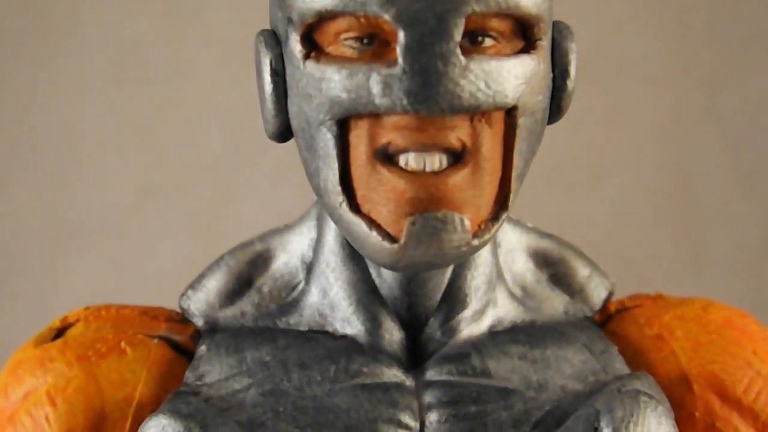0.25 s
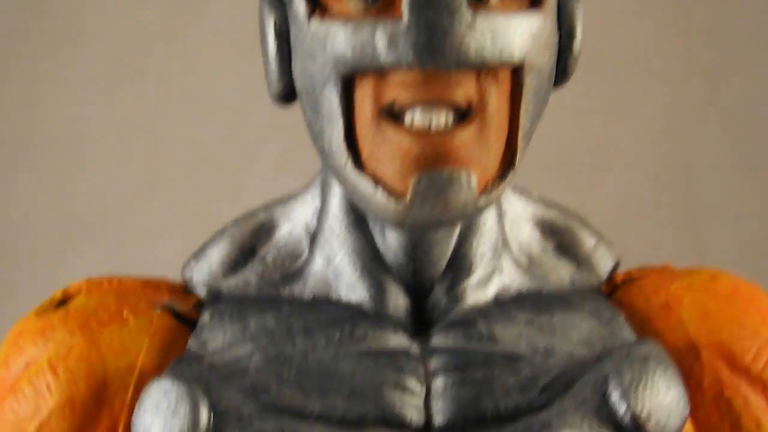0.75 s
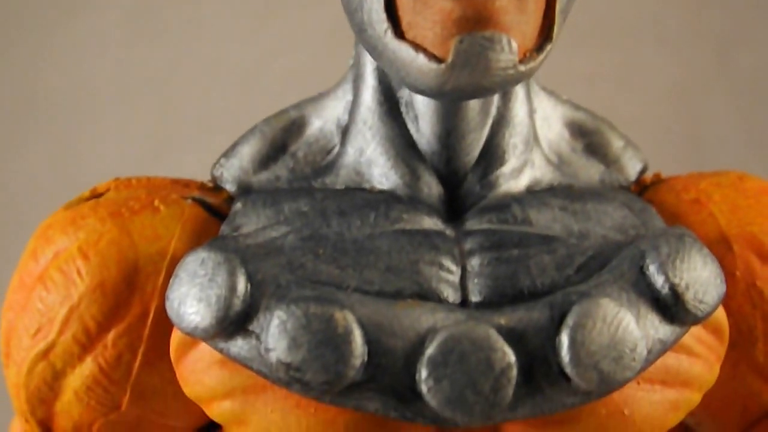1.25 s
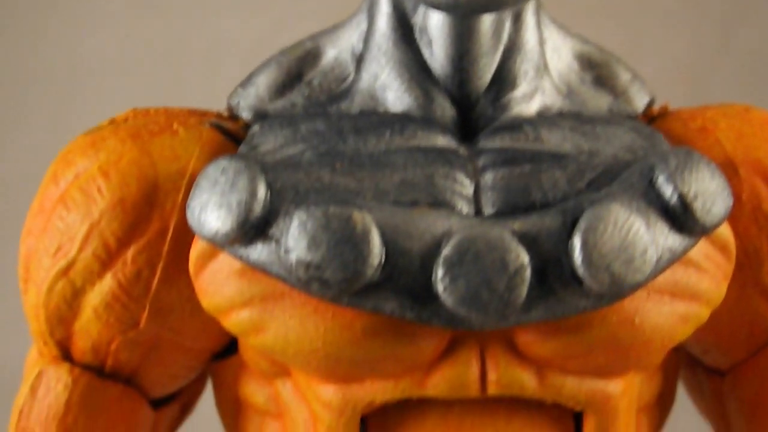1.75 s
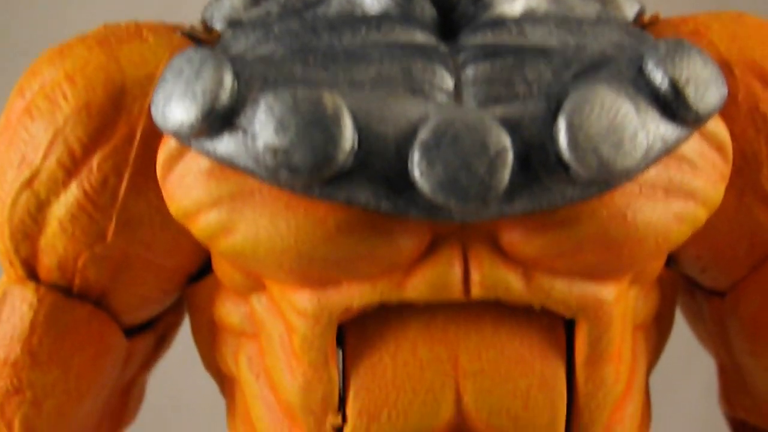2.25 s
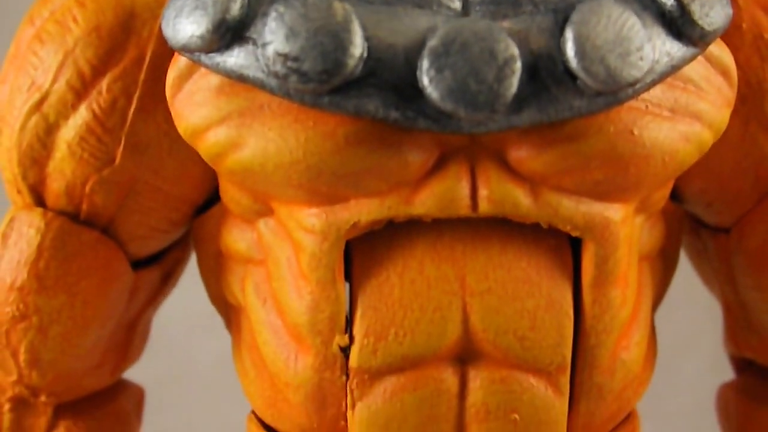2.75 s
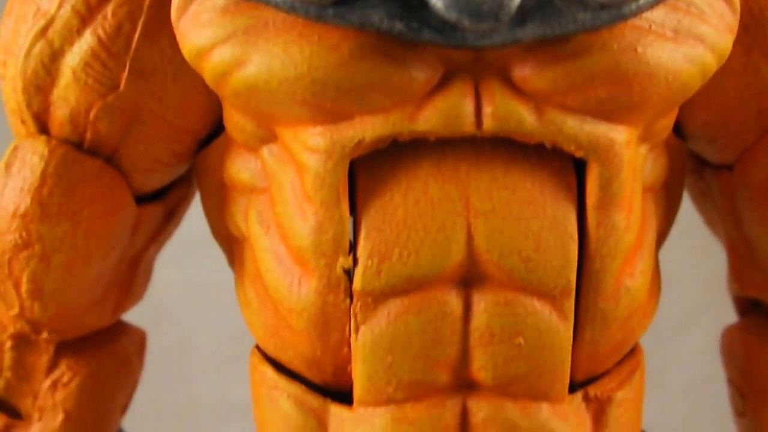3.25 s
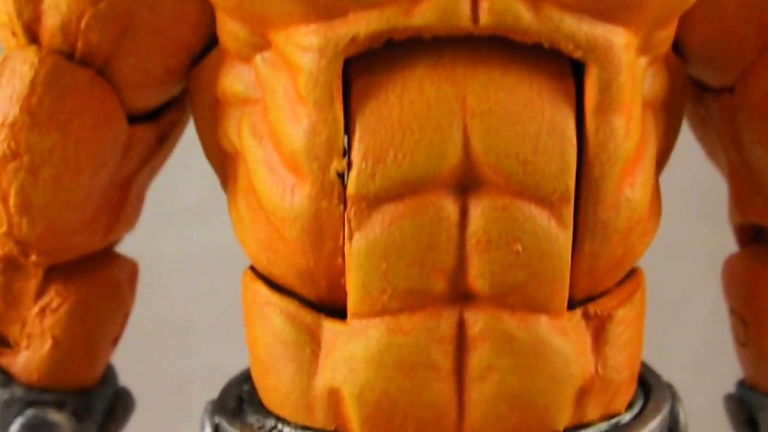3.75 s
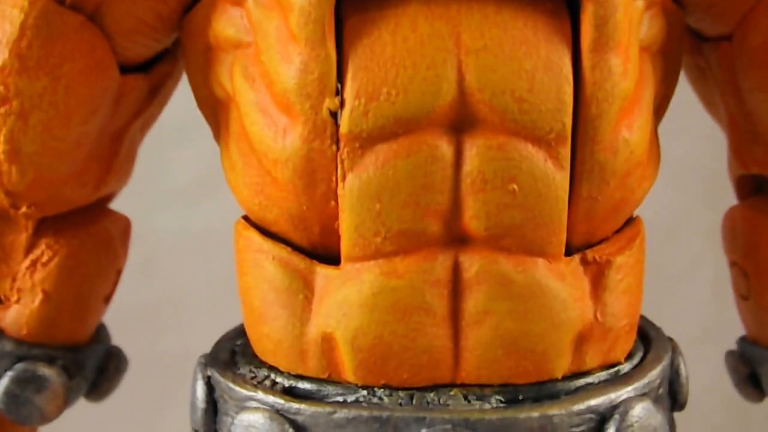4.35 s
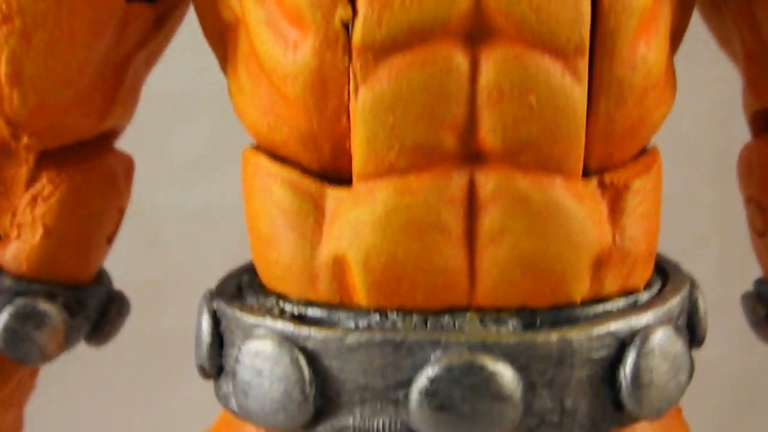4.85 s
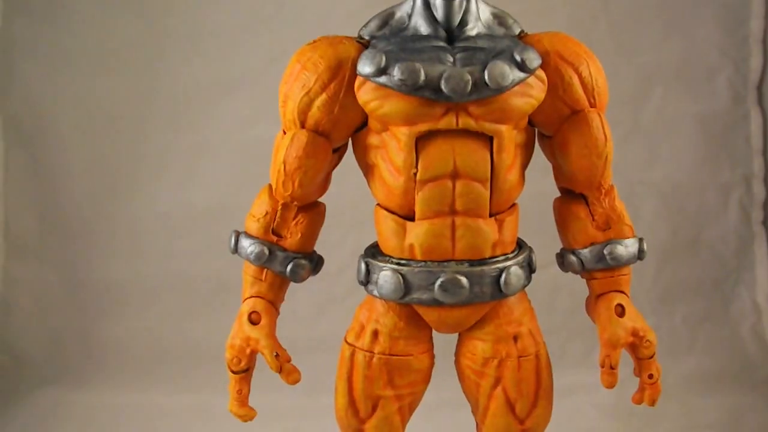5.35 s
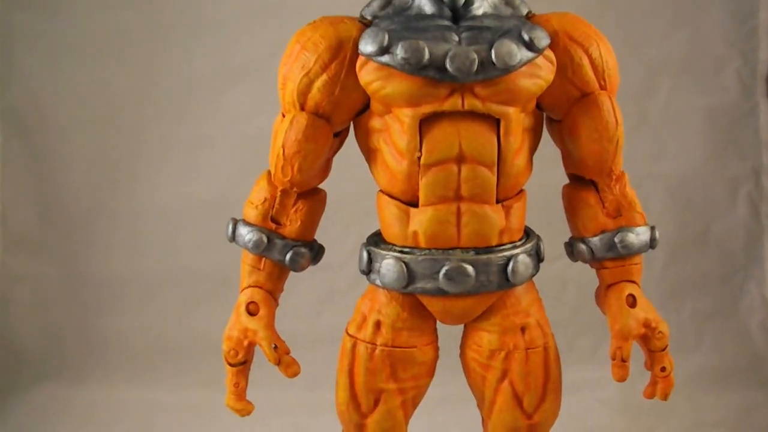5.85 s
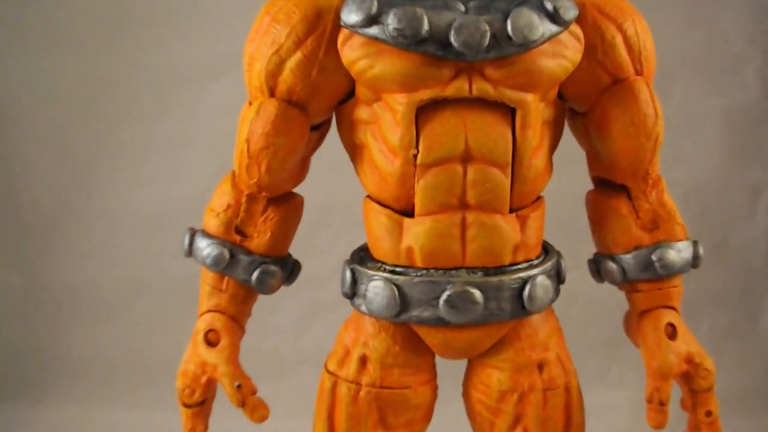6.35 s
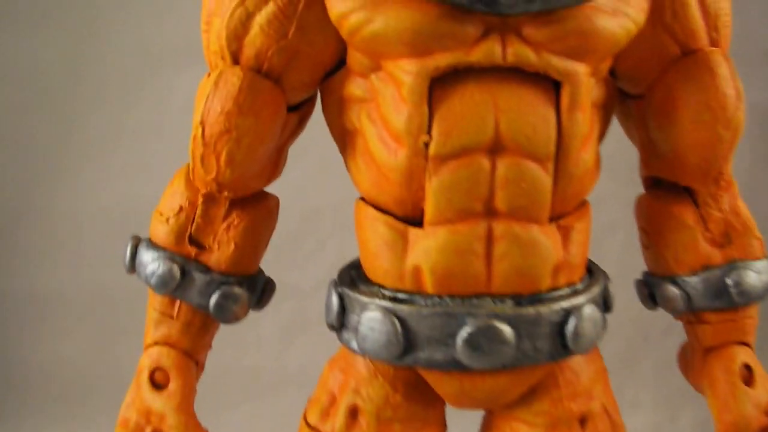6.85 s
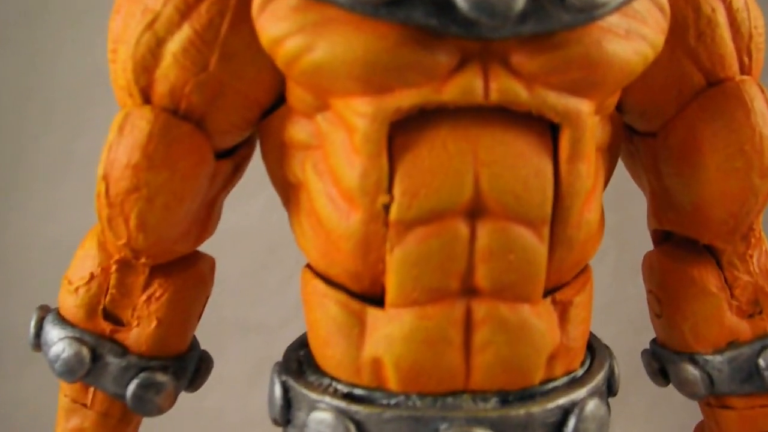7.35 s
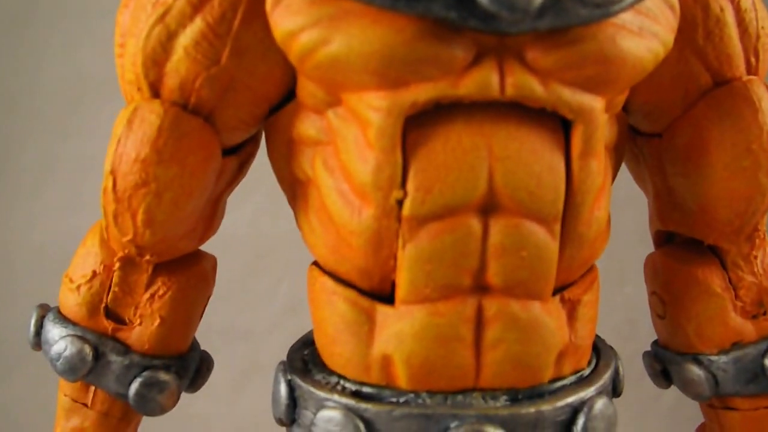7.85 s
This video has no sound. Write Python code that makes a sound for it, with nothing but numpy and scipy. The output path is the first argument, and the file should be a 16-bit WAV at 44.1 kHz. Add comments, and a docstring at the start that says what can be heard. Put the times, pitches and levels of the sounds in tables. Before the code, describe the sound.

A camera is heard through its own microphone in a quiet room, over steady low rumble, hiss and a hum that eases after the first second. A light tap comes at 0.3 seconds, then sharp control clicks at 1 and 1.6 seconds. Faint rubs on the body follow, with a cluster of softer, rattly clicks between 3 and 4 seconds. From 4.3 seconds the focus motor ticks in short, chirping pulses, quickening and ending with two clicks just before 5 seconds. The sound cuts out for an instant at 5 seconds. At 5.3 seconds a sharp knock on the housing, the loudest event, is followed by a smaller rebound. The motor ticks again, about ten pulses a second, from 5.5 to 6.3 seconds. A very faint zoom rustle swells and fades around 7 seconds, and the ticking returns from 7.5 seconds until the end, just after 8.

```python
"""A quiet room, in which a camera is heard through its own built-in microphone.
The sound is structure-borne: the focus motor steps in short bursts that force the housing to vibrate,
and the clicks, rattles and knocks of the controls excite the modes of the same shell.
Beneath them lie a faint rubbing drone of the shell as it is handled and tilted, the zoom's rustle,
room rumble, mains hum and hiss. The sound drops out once, briefly, about five seconds in."""
import sys
import numpy as np
from scipy import signal
from scipy.fft import rfft, irfft, next_fast_len
from scipy.io import wavfile
from scipy.ndimage import uniform_filter1d

SR = 44100
rng = np.random.default_rng(int(sys.argv[2]) if len(sys.argv) > 2 else 0)


def master_out(mix):
    """Clip the mix to full scale and print it as 16-bit PCM to the path in sys.argv[1]."""
    frames = np.transpose(np.atleast_2d(mix))
    ceiling = np.clip(frames, -1, 1)
    pcm = np.round(ceiling * 32767).astype(np.int16)
    wavfile.write(sys.argv[1], SR, pcm)


N = 357651
TIME = np.arange(N) / SR
BRIEF = TIME[:SR // 4]  # time axis of one short event [s]
IMPULSE = signal.unit_impulse(len(BRIEF))
TOP_HZ = 15800


# modes of the motor's mount: (frequency [Hz], T60 [s], level [dB])
MOUNT_MODES = [(203, 0.15, -0.5), (249, 0.078, -1), (302, 0.064, 2), (418, 0.026, 2), (515, 0.027, -4.5),
               (743, 0.015, 2.5), (803, 0.04, -0.5), (933, 0.065, 3.5), (1387, 0.064, -5)]
# spectrum of the gear's scrape: (frequency [Hz], gain [dB])
SCRAPE_SPECTRUM = [(500, -12), (1000, 1), (1450, 2), (1900, -2), (2400, -2), (2800, -1), (3300, -10),
                   (4500, -16), (12000, -22)]
def focus_motor(step_hz=1045, jitter=0.012, rise_s=0.0043, sag_s=0.014, stop_s=0.0041, scrape_s=0.0097):
    """Forced vibration: steps drive the shell near a resonance, and each start jolts the mount."""
    out = np.zeros(N)
    for start, db, run_s in focus_bursts():
        wobble, grit = rng.standard_normal((2, len(BRIEF)))
        rise_scale, sag_scale = np.exp(0.46 * rng.uniform(-0.53, 1, 2))
        attack = np.minimum(BRIEF / (rise_s * rise_scale), 1)
        decay = np.exp(-BRIEF / (sag_s * sag_scale) - np.maximum(BRIEF - run_s, 0) / stop_s)
        step_rate = step_hz * (1 + jitter * unit(uniform_filter1d(wobble, size=130)))
        torque = attack * decay * np.sin(2 * np.pi * np.cumsum(step_rate) / SR)
        tone = strong(torque) + undb(-12) * strong(housing(torque))
        # the gear takes up its play with a kick and a brief scrape
        scrape = grit * np.minimum(BRIEF / rise_s, 1) * np.exp(-BRIEF / scrape_s)
        jolt = signal.fftconvolve(scrape + 5 * IMPULSE, modes(MOUNT_MODES))[:len(BRIEF)]
        backlash = undb(-7) * strong(jolt) + undb(-16) * strong(colour(scrape, SCRAPE_SPECTRUM))
        backlash_db = -31.5 + 0.19 * (db + 31.5)  # stays strong even when the run is weak
        add(out, start, undb(db - 2.5) * strong(tone) + undb(backlash_db) * backlash)
    return out


# focus searches, broken off once the picture is sharp: (start [s], end [s], level [dB])
FOCUS_SEARCHES = [(4.252, 4.51, -35), (5.4733, 6.4, -33), (7.5411, 8.11, -31.5)]
# to-and-fro pattern of every search: (delay [s], relative level [dB])
PROBE_PATTERN = [(0, 1.5), (0.1086, -0.5), (.198, 2.5), (.310, -5), (0.401, 2), (0.504, 1), (.605, 2),
                 (.708, 4.5), (0.819, -7.5)]
def focus_bursts():
    """Hunting for focus gives intermittent runs, returned as (time [s], level [dB], duration [s])."""
    probes = [(start + delay, db + relative_db, 0.023)
              for start, end, db in FOCUS_SEARCHES
              for delay, relative_db in PROBE_PATTERN if start + delay < end]
    # the first search closes in with quicker, growing bursts, then settles with one long run
    approach = [(4.5535 + k * 0.0672, -31.5 + k * 0.5, 0.014) for k in range(4)]
    settle = [(4.801, -33, 0.033)]
    return probes + approach + settle


# modes of the catch and of its snap's bright edge: (frequency [Hz], T60 [s], level [dB])
CATCH_MODES = [(3060, 0.023, 15), (3760, 0.024, 11), (4160, 0.02, -16)]
EDGE_MODES = [(6000, 0.005, -2.2), (6730, 0.0039, -2), (7700, 0.0037, -3)]
# spectra of the catch's snap and chatter: (frequency [Hz], gain [dB])
SNAP_SPECTRUM = [(150, -18), (400, -34), (700, -24), (1100, 5), (1400, -26), (1750, -2.5), (2200, 12.5),
                 (2450, 4), (2900, 21), (3400, 2), (4100, 8), (4900, -15.5), (7000, -34), (9000, -45),
                 (16000, -28)]
CHATTER_SPECTRUM = [(1000, -28), (2100, -5.5), (2500, -7), (2850, 8), (3150, -6), (3450, -11), (4100, -14),
                    (4900, -25.5), (7000, -24), (12000, -28)]
# clicks of the controls: (time [s], level [dB], seating [dB re level], seating frequency [Hz],
# thump [dB re seating], rattle [dB re level], rattle rise time [s], contact corner [Hz])
CONTROL_CLICKS = [(0.979, -27, -5, 1055, -6, -16, 0.014, 8500),
                  (1.135, -44.5, -3, 1020, -3, -24, .01, 4500),
                  (1.599, -21.5, -9.5, 1030, -6, -16, 0.011, 7450),
                  (1.65, -43.5, -19, 950, -6, -9, 0.012, 3500),
                  (2.914, -41.5, -6, 970, 3, -12, 0.0074, 3500),
                  (3.0844, -47.5, 0.5, 1000, 2, -4.5, 0.016, 3500),
                  (3.2367, -34, -1, 1020, -3.5, -11.5, 0.0079, 7000),
                  (3.293, -40, -1.5, 980, -1, -4, 0.0091, 6500),
                  (3.429, -40, -1.5, 995, 1, -14, .006, 5500),
                  (3.733, -34, -1.5, 1010, -3, -7.5, 0.018, 9500),
                  (3.929, -43.5, -4, 990, 2, -14, 0.009, 5000),
                  (4.779, -31.5, 1.5, 1006, -6.5, -17, 0.0088, 11000),
                  (4.8993, -31, 2, 1017, -7, -9.5, .02, 6000)]
def clicks(snap_s=0.00078, seat_s=0.0094, uneven_db=7):
    """Impulsive excitation: a catch snaps, seats with a chirp and thump, then chatters on the shell."""
    out = np.zeros(N)
    thump = strong(band(contact_force(910), 430, 560))
    shell = strong(band(contact_force(2500), 1400, 300))
    for start, db, seat_db, seat_hz, thump_db, rattle_db, crest_s, corner_hz in CONTROL_CLICKS:
        seat = chirp(seat_hz, seat_s) + undb(thump_db) * thump + undb(-8) * shell
        grit, impacts, size = rng.standard_normal((3, len(BRIEF)))
        force = IMPULSE + 0.42 * grit * np.exp(-BRIEF / snap_s)
        ring = undb(-8) * strong(modes(CATCH_MODES)) + undb(-13) * strong(modes(EDGE_MODES))
        snap = strong(colour(force, SNAP_SPECTRUM)) + ring
        snap = strong(butterworth(snap, 3, min(corner_hz, TOP_HZ)))
        swell = BRIEF / crest_s * np.exp(-0.5 * (BRIEF / crest_s) ** 2)
        chatter = impacts * undb(uneven_db * np.minimum(size, 2)) * swell
        shell_ring = undb(-4) * strong(band(housing(chatter), 1130, 460))
        crackle = undb(-8) * strong(double_band(chatter, 1000, 1700))
        rattle = strong(strong(colour(chatter, CHATTER_SPECTRUM)) + shell_ring + crackle)
        add(out, start, undb(db) * (undb(-2) * snap + undb(seat_db) * seat + undb(rattle_db) * rattle))
    return out


# knocks on the housing: (time [s], level [dB], contact corner [Hz], low cut [Hz], damping time [s],
# rebound delay [s], rebound frequency [Hz], rebound [dB re blow],
# snap frequency [Hz], snap duration [s], snap [dB re blow], crack [dB re blow])
HOUSING_KNOCKS = [(0.2709, -26, 1330, 1200, 0.016, 0.003, 1265, -6.5, 2833, 0.0052, -7.5, -54),
                  (5.2931, -8, 3150, 45, 0.069, .00457, 1085, -8.6, 2690, .0031, -15, -23),
                  (5.3464, -19, 1060, 80, 0.073, 0.00388, 954, -3.5, 2850, 0.0038, -13.5, -31),
                  (5.3727, -36, 2600, 500, .015, .003, 1090, -6, 2820, 0.0054, -2, -20)]
def knocks(yield_s=0.00092, rebound_s=0.0086, crack_delay_s=0.00172):
    """Damped impact: the hand deadens a blow; the catch snaps home with a crack and the part rebounds."""
    out = np.zeros(N)
    soft_touch = undb(-9) * contact_force(1750)
    crack = strong(band(IMPULSE, 4800, 6500))
    for (start, db, corner_hz, low_cut_hz, damping_s, delay_s, rebound_hz, rebound_db,
         snap_hz, snap_s, snap_db, crack_db) in HOUSING_KNOCKS:
        force = soft_touch + contact_force(corner_hz, yield_s)
        # a light, glancing blow hardly moves the shell's low modes
        ring = butterworth(housing(force), 3, low_cut_hz, "high")
        blow = strong(ring * np.exp(-BRIEF / damping_s))
        rebound = undb(rebound_db) * chirp(rebound_hz, rebound_s, delay_s)
        snap = undb(snap_db) * chirp(snap_hz, snap_s)
        add(out, start, undb(db) * (blow + rebound + snap))
        add(out, start + crack_delay_s, undb(db + crack_db) * crack)
    return out


# modes of the camera's shell: (frequency [Hz], T60 [s], level [dB])
SHELL_MODES = [(306, 0.015, 17.5), (389, 0.5, -4), (780, 0.047, -6.5), (998, 0.051, -9), (1091, 0.051, 5.4),
               (1160, 0.18, -21), (1183, 0.041, -2), (1368, 0.022, -4), (1490, 0.013, 1.5),
               (1780, 0.014, -1), (2194, 0.021, -0.5), (2686, 0.011, 13), (2888, 0.055, -1.5),
               (3140, 0.016, -6)]
def housing(force, radiation_hz=740):
    """Modal response: close modes of the shell beat, and so small a body radiates little bass."""
    impulse_response = butterworth(modes(SHELL_MODES), 4, radiation_hz, "high")
    return signal.fftconvolve(force, impulse_response)[:len(force)]


# loose parts shaken by a click or knock: (time [s], level [dB], frequency [Hz], bandwidth [Hz])
LOOSE_PARTS = [(1.6055, -36, 2750, 400), (1.6145, -38, 3100, 350), (5.3495, -44.5, 3720, 110),
               (5.368, -44, 4700, 700)]
def ticks():
    """Free vibration: each loose part rings briefly in one high resonance."""
    out = np.zeros(N)
    for start, db, hz, width_hz in LOOSE_PARTS:
        add(out, start, undb(db) * strong(double_band(IMPULSE, hz, width_hz)))
    return out


# stuttering rubs heard in the shell: (time [s], duration [s], level [dB], frequency [Hz])
RUB_SPURTS = [(0.448, .045, -54, 1060), (1.799, 0.018, -58, 1080), (1.921, .03, -48, 1055),
              (1.958, 0.053, -55, 1050), (2.282, .05, -48.5, 1068), (2.463, 0.046, -50, 1070),
              (2.71, 0.04, -49.5, 1090), (3.31, 0.016, -43, 1195), (3.565, 0.03, -68, 1070),
              (8.069, 0.024, -43.5, 1060)]
# low swells of the handled body: (time [s], duration [s], level [dB], frequency [Hz], bandwidth [Hz])
HANDLING_SWELLS = [(3.03, 0.16, -42.5, 135, 26), (6.25, 0.5, -46.5, 162, 40)]
def brief_friction(spurt_width_hz=120):
    """Frictional excitation: each short rub feeds noise into one resonance of the camera's body."""
    out = np.zeros(N)
    spurts = [(*row, spurt_width_hz) for row in RUB_SPURTS]
    for start, length_s, db, hz, width_hz in spurts + HANDLING_SWELLS:
        steady_rub = double_band(rng.standard_normal(2 * SR), hz, width_hz)[SR:]
        envelope = np.sin(np.pi * np.minimum(TIME[:SR] / length_s, 1))
        add(out, start, undb(db) * strong(steady_rub * envelope))
    return out


# faint rubbing drone of the handled shell: (time [s], level [dB])
DRONE_LEVELS = [(0.0, -60.5), (0.56, -61), (0.97, -56.5), (1.33, -59), (1.76, -56.5), (2.1, -62),
                (3.16, -57.5), (4.11, -59.5), (4.85, -53), (4.98, -59), (6.2, -58), (6.9, -61.5),
                (8.1, -59)]
def handling_drone(drone_hz=1095, uneven_db=2.5):
    """Sliding friction: the shell drones faintly and unevenly as it is handled and tilted."""
    friction = rng.standard_normal(N) * undb(uneven_db * wander(rate_hz=16))
    rubbing = double_band(friction, drone_hz, 300)
    drone = unit(unit(rubbing) + undb(-16.5) * unit(band(rubbing, drone_hz, 39)))
    return gain_curve(DRONE_LEVELS) * drone


def zoom_rustle(peak_s=6.96, peak_db=-56.5, fade_db_per_s=22):
    """Band-limited noise: the rustle rises and falls as the zoom speeds up and slows down."""
    rustle = unit(double_band(rng.standard_normal(N), 2870, 1600))
    return undb(peak_db - fade_db_per_s * np.abs(TIME - peak_s)) * rustle


# spectra of the room's rumble and of the hiss: (frequency [Hz], gain [dB])
RUMBLE_SPECTRUM = [(18, -3.5), (28, -1), (40, 0), (52, -5.5), (64, -8.5), (80, -19), (100, -15.5),
                   (135, -19.5), (160, -21), (235, -24.5), (320, -30.5), (420, -33.5), (620, -36.5),
                   (1200, -40.5)]
HISS_SPECTRUM = [(300, -9), (800, -0.5), (1400, 1), (1700, -3), (2400, -2), (2800, -2), (3300, 0.5),
                 (3800, -4.5), (4050, -4.5), (4400, -2.5), (4900, -9), (8000, -10.5), (16000, -13)]
# mains hum, stronger for the first second: (time [s], level [dB])
HUM_LEVELS = [(0, -48), (1.15, -48), (1.35, -55), (8.1, -56)]
# narrow resonances in the hiss: (frequency [Hz], nominal bandwidth [Hz], level [dB])
HISS_RESONANCES = [(2688, 107, -66), (3723, 135, -65.5), (4206, 67, -70.5), (7770, 290, -81),
                   (12100, 550, -77.5), (13200, 500, -85)]
def room(rumble_db=-38.5, fade_db_per_s=0.16, hum_hz=118.7, waver_depth=1.96, hiss_db=-56):
    """Superposition: easing rumble, amplitude-modulated mains hum and hiss form the noise floor."""
    low, high, stir = rng.standard_normal((3, N))
    waver = (1 + waver_depth * wander(rate_hz=13.2)) / np.sqrt(1 + waver_depth ** 2)
    hum = gain_curve(HUM_LEVELS) * waver * np.sqrt(2) * np.sin(2 * np.pi * hum_hz * TIME)
    deep_noise = butterworth(colour(low, RUMBLE_SPECTRUM), 3, [15, 900], "band")
    rumble = undb(rumble_db - fade_db_per_s * TIME) * unit(deep_noise)
    hiss = undb(hiss_db) * unit(colour(high, HISS_SPECTRUM))
    whirr = sum(undb(db) * unit(double_band(stir, hz, 2 * width)) for hz, width, db in HISS_RESONANCES)
    return rumble + hum + hiss + whirr


def contact_force(corner_hz, delay_s=0):
    """Time-bandwidth reciprocity: a softer contact lasts longer and has a lower corner frequency."""
    age = np.maximum(BRIEF - delay_s, 0) * 2 * np.pi * corner_hz
    return age ** 3 * np.exp(-age)


def chirp(hz, length_s, delay_s=0):
    """Tone burst: a part sliding home gives a few swelling and fading cycles at one frequency."""
    age = BRIEF - delay_s
    envelope = np.sin(np.pi * np.clip(age / length_s, 0, 1)) ** 2
    return strong(envelope * np.sin(2 * np.pi * hz * age))


def modes(table):
    """Modal superposition: one damped sinusoid per row (frequency [Hz], T60 [s], level [dB])."""
    return sum(undb(db) * np.exp(-np.log(1000) * BRIEF / t60) * np.sin(2 * np.pi * hz * BRIEF)
               for hz, t60, db in table)


def band(x, hz, width_hz):
    """Second-order resonance."""
    return signal.lfilter(*signal.iirpeak(hz, hz / width_hz, fs=SR), x)


def double_band(x, hz, width_hz):
    """Two equal resonances in cascade, together narrower than either."""
    return band(band(x, hz, width_hz), hz, width_hz)


def butterworth(x, order, hz, kind="low"):
    """Filter with a maximally flat passband."""
    return signal.sosfilt(signal.butter(order, hz, kind, fs=SR, output="sos"), x)


def colour(x, spectrum):
    """Minimum-phase filter through points (frequency [Hz], gain [dB])."""
    n = 2 * next_fast_len(len(x))
    hz, db = np.transpose(spectrum)
    bin_hz = np.arange(n // 2 + 1) * SR / n + 1e-9
    log_gain = np.log(undb(np.interp(np.log(bin_hz), np.log(hz), db)))
    cepstrum = irfft(log_gain)[:n // 2]
    cepstrum[1:] *= 2  # folding onto positive time makes the filter causal
    return irfft(rfft(x, n) * np.exp(rfft(cepstrum, n)))[:len(x)]


def wander(rate_hz):
    """Random fluctuation: low-passed noise with rms 1."""
    return unit(butterworth(rng.standard_normal(N), 2, rate_hz))


def undb(db):
    """Decibels to amplitude ratio."""
    return 10 ** (np.asarray(db) / 20)


def unit(x):
    """Normalise to rms 1."""
    return x / np.sqrt(np.mean(x ** 2))


def strong(x):
    """Normalise the loudest 3 ms to rms 1."""
    return x / np.sqrt(uniform_filter1d(x ** 2, size=132).max())


def gain_curve(rows):
    """Envelope through points (time [s], level [dB])."""
    return undb(np.interp(TIME, *np.transpose(rows)))


def add(out, start_s, x):
    """Superpose x on out from a given time."""
    i = int(round(start_s * SR))
    out[i:i + len(x)] += x[:N - i]


def scene():
    """Linear superposition: all sources sum at one microphone, which feeds both channels."""
    mono = focus_motor() + clicks() + knocks() + ticks() + brief_friction()
    mono += handling_drone() + zoom_rustle() + room()
    return np.array([mono, mono])


def record(dry, gap_start_s=5.014, gap_end_s=5.037):
    """Gating and band limiting: one brief silence, before which the left channel lags by a sample."""
    left = np.where(TIME < gap_start_s, np.roll(dry[0], 1), dry[0])
    gate = (TIME < gap_start_s) | (TIME > gap_end_s)
    low_pass = signal.ellip(10, 0.1, 80, TOP_HZ, fs=SR, output="sos")
    return signal.sosfilt(low_pass, np.array([left, dry[1]]) * gate)


dry = scene()
out = record(dry)
master_out(out)
```